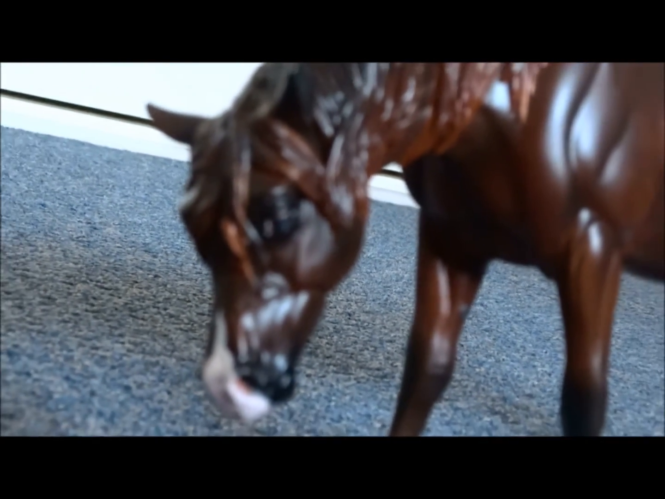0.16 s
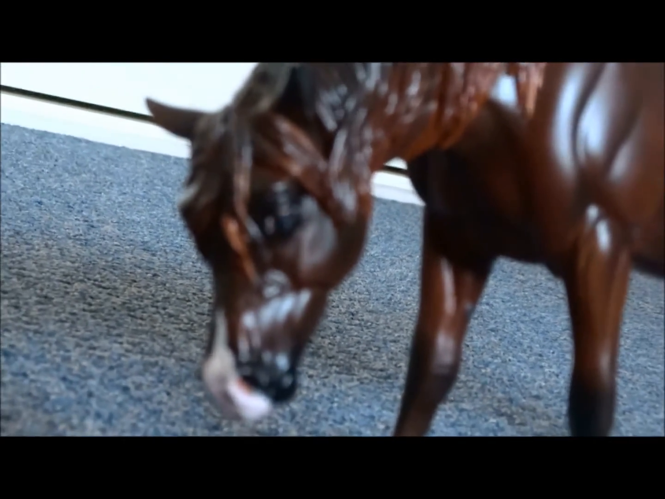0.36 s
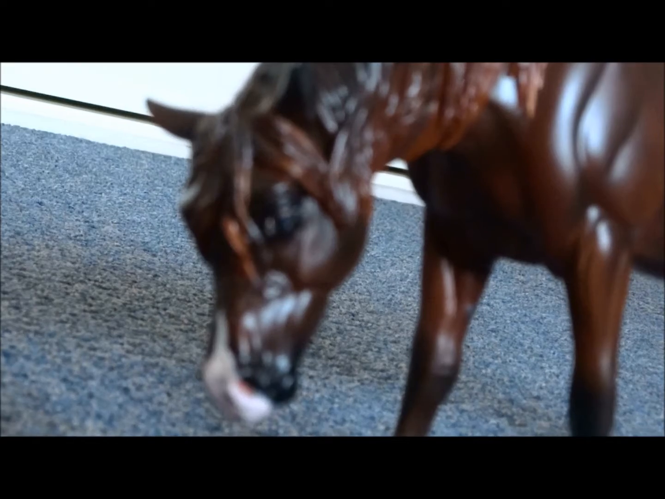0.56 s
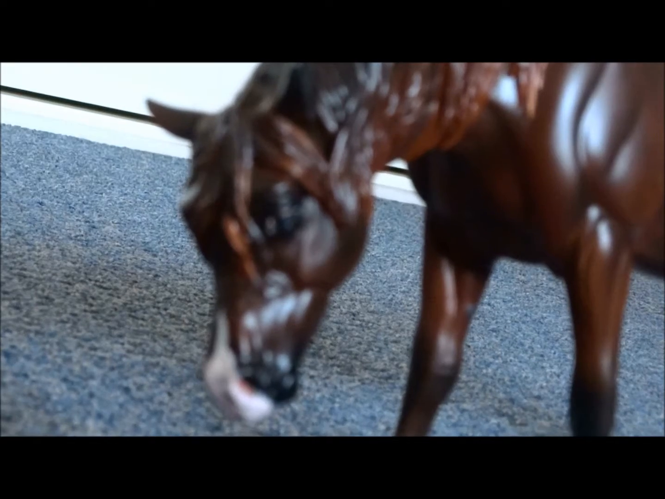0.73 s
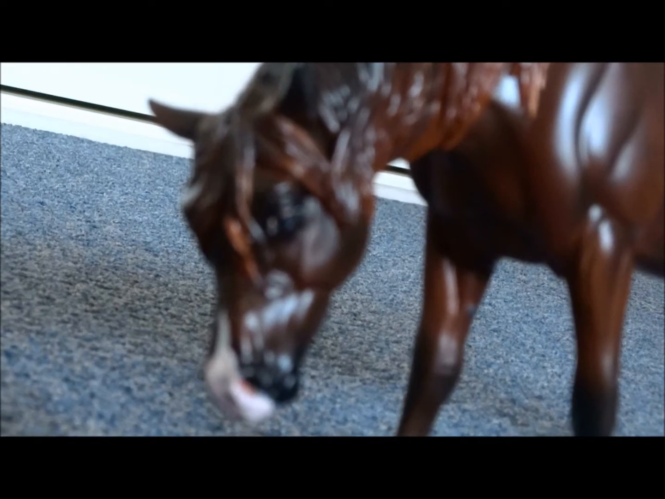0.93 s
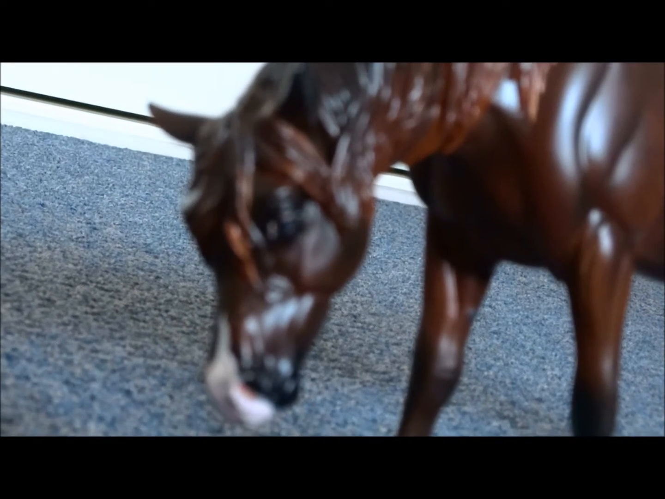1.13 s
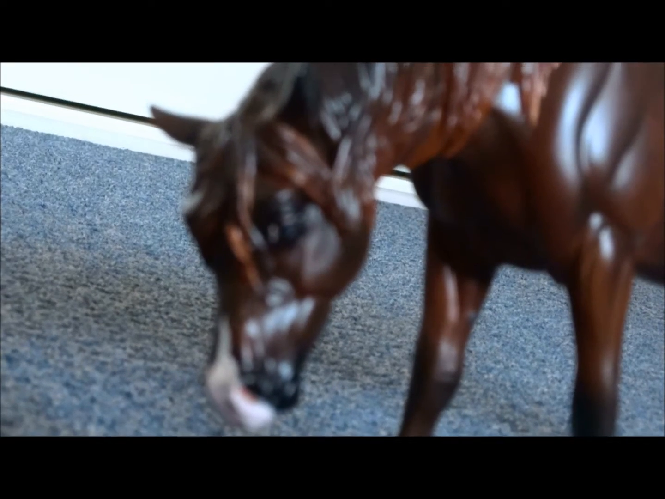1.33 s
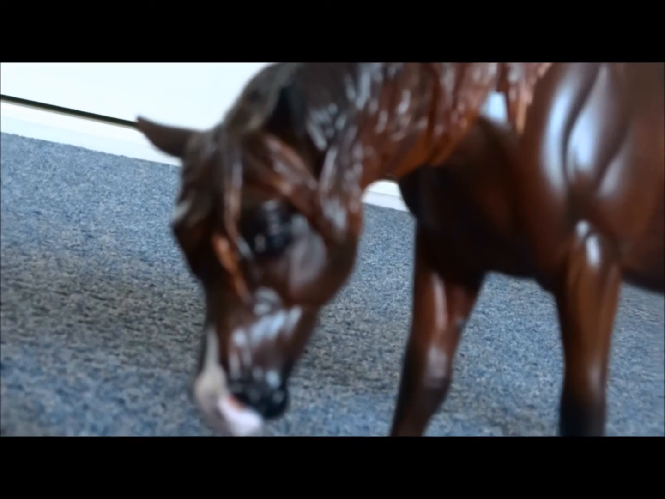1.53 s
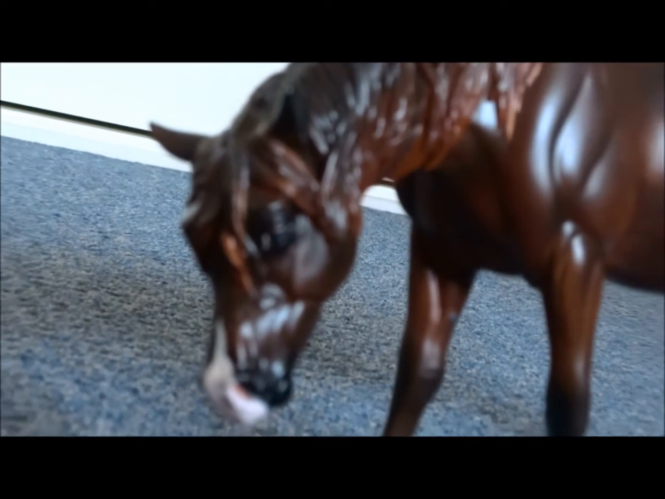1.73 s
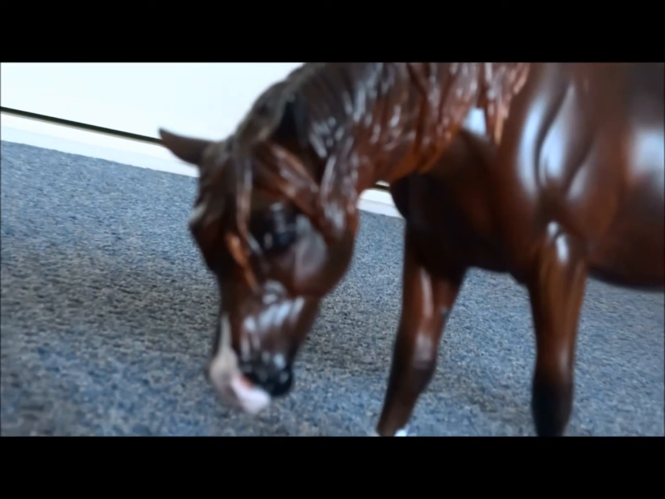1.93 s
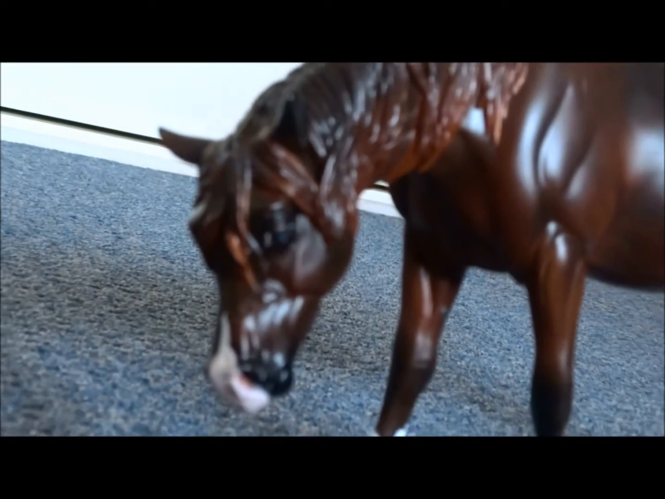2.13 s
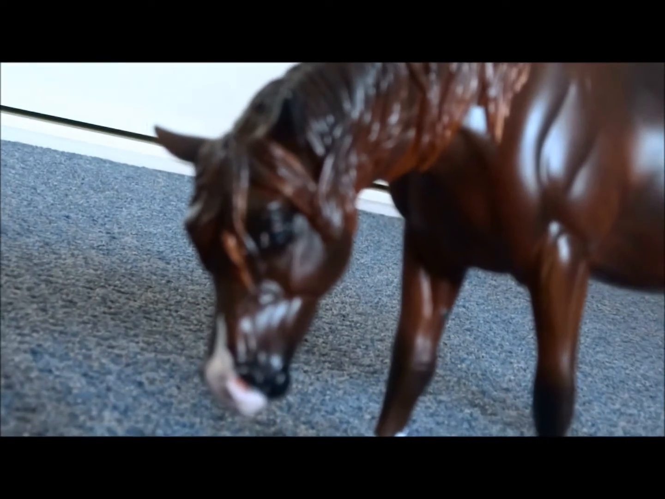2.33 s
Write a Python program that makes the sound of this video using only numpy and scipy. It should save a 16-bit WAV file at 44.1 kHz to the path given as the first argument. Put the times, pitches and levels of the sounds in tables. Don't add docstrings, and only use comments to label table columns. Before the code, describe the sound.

A tiny camera focus motor, heard very close through the camera body, finishes a short buzzing whir, falls quiet over hiss and faint regular ticks, snaps twice, then clunks loudly and whirs again before stopping.

```python
import sys
import numpy as np
from scipy import signal
from scipy.fft import rfft, irfft, next_fast_len
from scipy.io import wavfile
from scipy.ndimage import map_coordinates

SR = 44100
rng = np.random.default_rng(int(sys.argv[2]) if len(sys.argv) > 2 else 0)


def digitize_waveform(pressure):
    field = np.atleast_2d(pressure).T
    bounded = np.clip(field, -1, 1)
    quanta = np.round(bounded * 32767).astype(np.int16)
    wavfile.write(sys.argv[1], SR, quanta)


def volts_from_decibels(level):
    exponent = np.asarray(level, float) / 20
    return 10 ** exponent


N = 105443

# start_s, end_s, level_db, rise_s
OUT_RUNS = [
    (-.3, .025, -50.5, .02),
    (1.385, 1.92, -50.5, 0.15),
]
IN_RUNS = [
    (.088, .288, -52, 0.035),
    (1.988, 2.19, -52.5, 0.025),
]
# centre_hz, width_hz, level_db
OUT_HOUSING = [(579, 48, -6), (922, 75, -8), (1103.5, 39, 3.5), (1338, 52, 0.5), (1714, 61, 2),
               (1871, 39, -2.5), (2240, 48, -34)]
OUT_GEARS = [(2790, 79, -18), (3680, 210, -8), (2900, 2900, -24.5), (4850, 210, -6), (5230, 370, -12.5),
             (5630, 45, -11), (6340, 520, -4.5), (6740, 47, -2.5), (7570, 106, -2.5), (8325, 120, 4.5),
             (8830, 28, -1.5), (10110, 41, 2), (10910, 310, 1), (9540, 970, -21.5)]
IN_HOUSING = [(224, 114, -7.5), (390, 108, -1.5), (600, 120, 1), (1015, 138, 3), (1210, 410, 1),
              (1697, 49, 5), (1770, 87, -0.5)]
IN_GEARS = [(3605, 75, 3), (4930, 400, 2), (5240, 85, 3.5), (5780, 200, -2.5), (6460, 320, 2.5),
            (6800, 190, -13), (7430, 140, -5.5), (8600, 130, -26), (10610, 400, 0.5)]
TURNS_PER_S, SPEED_WANDER = 60, 0.002
HOUSING_TOP_HZ = 1960
GEARS_BITE_S = 0.0075
SWELL_FULL_HZ, SWELL_SCATTER_RAD = 8000, 0.5
UNSTEADY_DB, FLUTTER_DB = 1.8, 1.5
WHINE_HZ, WHINE_DB, WHINE_WAVER_DB = 592, -12.5, 1.5
STOP_S = 0.012

# time_s, peak_db, thud_db, knock_db, ring_db
CLICKS = [(0.112, -44, -7, -7, -3), (0.126, -31, -18, -14, -2), (1.382, -37.5, -9, -3, -28),
          (1.403, -29, -10.5, -3.5, -6), (1.44, -24.5, -13, -2.5, -5.5), (1.454, -13, -16, -8.5, -8.5),
          (1.488, -15, -15, -14.5, -8), (1.534, -32, -9, -11, -16), (2.01, -28, -20.5, -8, -2.5),
          (2.038, -40, -22, -2, -14), (2.069, -36.5, -17, -8, 0.5), (2.081, -48, -3, -19, -14),
          (2.114, -38.5, -2, -7, -10)]
SNAPS = [
    (1.103, -53, -20, -4, -12),
    (1.156, -40, -3, -12, -8),
    (1.132, -45.5, -6, -4.5, 0),
    (1.137, -26.5, -15.5, -6, -17),
    (1.16, -24.5, -13.5, -11, -12),
    (1.265, -44, -35, -8, -33),
]
# freq_hz, level_db, t60_s
THUD_MODES = [(223, -13, 0.05), (510, 3, 0.079), (605, 7, 0.079), (763, 1, 0.078), (983, 10, 0.031),
              (1197, -2, 0.14)]
KNOCK_MODES = [(1455, -6.5, 0.045), (1802, 0.5, 0.045), (2404, 0.5, 0.019), (2840, -2, 0.029),
               (3507, 1.5, 0.016)]
RING_MODES = [(4734, 2, 0.011), (5200, -9, 0.006), (6260, -7, 0.009), (7090, -7, 0.009), (8300, -1, 0.009),
              (8844, -10, 0.008), (10350, -15, 0.008)]
CONTACT_S = 0.00093
CRACK, SCATTER_DB = 0.65, 2

# start_s, end_s, level_db, rise_s
CRUNCHES = [
    (1.392, 1.42, -51, 0.0029),
    (1.42, 1.442, -40.5, 0.02),
    (1.446, 1.454, -39, 0.0049),
    (1.456, 1.475, -52, 0.0022),
    (1.478, 1.487, -45, 0.004),
    (.138, .155, -55.5, 0.0089),
    (2.055, 2.075, -61, 0.021),
]
# start_s, end_s, level_db, rise_s
SLIDES = [
    (1.165, 1.243, -56, 0.003),
    (1.243, 1.271, -57, 0.013),
]
# centre_hz, width_hz, level_db
SLIDER_PEAKS = [(590, 120, 2.5), (1920, 84, -5), (2530, 31, -1), (3500, 160, -7.5), (4690, 73, -4),
                (6200, 120, -14), (6960, 68, -5), (7540, 50, -1.5), (7880, 73, -1.5), (8660, 61, -6)]
# start_s, end_s, level_db, rise_s
COASTS = [
    (.288, 0.33, -61.5, 0.0039),
    (2.188, 2.215, -58, 0.0043),
    (0.028, 0.026, -55, .002),
    (1.925, 1.934, -63, 0.0023),
]

# time_s, peak_db
PIPS = [(0.019, -41), (.089, -48), (.096, -46), (.111, -53), (.12, -50), (0.134, -33.5), (.14, -40),
        (0.148, -40), (0.207, -47), (1.989, -46), (2.002, -54), (2.028, -39.5), (2.038, -42.5),
        (2.114, -49), (2.146, -49)]
# freq_hz, level_db, t60_s
PIP_MODES = [(1238, -7, 0.031), (1360, 4, 0.006), (1620, -2, 0.0085)]
# time_s, peak_db
SKIPS = [
    (.019, -46.5),
    (1.667, -42),
    (1.832, -55),
    (1.898, -56),
    (1.913, -40.5),
    (2.031, -60),
    (2.141, -44),
]
# freq_hz, level_db, t60_s
SKIP_MODES = [(6120, -3, 0.022), (6920, -3.5, 0.037), (8900, -4, 0.01)]
# start_s, end_s, level_db, rise_s
SQUEALS = [
    (.105, .12, -55, .006),
    (.139, .155, -52, 0.0032),
    (.168, .176, -52, .004),
    (1.413, 1.418, -52, .002),
    (1.428, 1.441, -47, 0.0078),
    (1.448, 1.457, -43.5, 0.0039),
    (1.999, 2.008, -52.5, 0.0075),
    (2.03, 2.045, -50, 0.0098),
    (2.052, 2.078, -47, 0.011),
]
# centre_hz, width_hz, level_db
SQUEAL_TOOTH = [(4735, 320, 0)]

# start_s, end_s, level_db, rise_s
SONGS = [
    (.17, .288, -62, .06),
    (2.11, 2.188, -55.5, 0.057),
]
# centre_hz, width_hz, level_db
SONG_TEETH = [(6870, 340, -4), (7680, 290, 1)]
# start_s, end_s, level_db, rise_s
IDLES = [
    (.025, .04, -65.5, 0.0055),
    (.288, .33, -68, .004),
    (1.92, 1.94, -68.5, 0.0043),
    (2.188, 2.21, -67.5, .004),
]
# centre_hz, width_hz, level_db
IDLE_TEETH = [(3420, 500, 1), (6140, 4200, -5.5)]
# time_s, peak_db
SETTLES = [
    (.036, -50.5),
    (.301, -52),
    (.318, -50),
    (.33, -47),
    (.228, -41.5),
    (1.505, -38),
    (2.08, -41),
]
# freq_hz, level_db, t60_s
SETTLE_MODES = [(338, -10, 0.025), (616, 3, 0.033), (1080, -3, 0.022)]

# time_s, peak_db
TICKS = [(0.498, -60), (0.574, -54), (0.613, -56.5), (0.653, -58), (0.695, -56.5), (0.734, -57),
         (0.776, -56), (0.814, -75), (0.856, -56.5), (0.894, -56), (0.934, -65), (0.973, -57.5),
         (1.014, -55.5), (1.052, -59), (1.093, -52.5), (1.295, -52.5), (1.333, -54)]
# freq_hz, level_db, t60_s
TICK_MODES = [(235, 3.5, 0.014), (496, 5.5, 0.056), (604, -2, 0.022), (846, -18, 0.037)]
TICK_LIFT_DB = 0.5
# centre_hz, width_hz, level_db
HUM_PEAKS = [(508, 71, 2), (858, 47, 11)]
# start_s, end_s, level_db, rise_s
HUM_RUN = [
    (0.48, 2.2, -73, 0.34),
]
# centre_hz, width_hz, level_db
RUMBLE_PEAKS = [(175, 116, 0)]
# start_s, end_s, level_db, rise_s
RUMBLE_RUN = [
    (1.028, 1.603, -70, 0.086),
]

# freq_hz, level_db_per_hz
HISS = [(12, -19), (20, -9.5), (112, -4.5), (258, -2.5), (392, -2), (764, -2.5), (981, -5), (1410, -8),
        (15400, -25)]
# freq_hz, likeness
HISS_ALIKE = [(60, 1), (240, 0.25), (950, 0.01), (3760, 0.22), (14900, 1)]
HISS_DB = -66
# freq_hz, side_under_mid_db
SIDE_DB = [(60, -5), (180, -10), (550, -5), (1640, -6), (4960, -11), (14900, -12.5)]
BODY_LOW_HZ = 115
MIC_TOP_HZ, MIC_FALL = 10500, 8.2
CUT_HZ, CUT_JITTER_HZ = 15250, 150
CUT_HZ_PER_DB, QUIET_DB = 200, -57


def unit(x):
    return x / np.sqrt(np.mean(x ** 2) + 1e-20)


def along(points, hz):
    f, v = np.transpose(points)
    return np.interp(np.log(hz + 1), np.log(f + 1), v)


def wobble(rate_hz):
    knots = rng.standard_normal(int(N * rate_hz / SR) + 4)
    return map_coordinates(knots, [np.arange(N) * rate_hz / SR])


def filtered(x, response):
    m = next_fast_len(N + SR // 8)
    return irfft(rfft(x, m) * response(np.fft.rfftfreq(m, 1 / SR)), m)[..., :N]


def body(peaks, wider):
    def response(f):
        total = 0
        for k, (centre_hz, width_hz, db) in enumerate(peaks):
            loss = 1j * f * width_hz * wider
            total = total + (-1) ** k * volts_from_decibels(db) * loss / (centre_hz ** 2 - f * f + loss)
        return total
    return response


def rubbing(grain_db, grain_hz, response):
    return unit(filtered(rng.standard_normal(N) * volts_from_decibels(grain_db * wobble(grain_hz)), response))


def resonant(peaks):
    return unit(filtered(rng.standard_normal(N), lambda f: body(peaks, 1)(f) ** 2))


def spells(rows, stop_s=STOP_S):
    t = np.arange(N) / SR
    total = np.zeros(N)
    for start, end, db, rise in rows:
        fall_db = 26 * np.clip(t - end, 0, 1) / stop_s
        total += volts_from_decibels(db - fall_db) * np.clip((t - start) / rise, 0, 1)
    return total


def strikes(times, levels_db, modes, contact_s):
    out, t = np.zeros(N + SR), np.arange(SR // 16) / SR
    hz, db, t60 = np.transpose(modes)[:, :, None]
    band = signal.butter(3, [.8 * hz.min(), 1.15 * hz.max()], "bandpass", fs=SR, output="sos")
    for s, level_db in zip(times, levels_db):
        level_draw, pitch_draw, phase_draw = rng.standard_normal((3, len(modes), 1))
        decay = volts_from_decibels(db + SCATTER_DB * level_draw - 60 * t / t60)
        ring = decay * np.sin(2 * np.pi * hz * (1 + 0.019 * pitch_draw) * t + 2 * phase_draw)
        crack = unit(signal.sosfilt(band, rng.standard_normal(len(t))))
        crack = crack * volts_from_decibels(db.max() - 60 * t / t60.min())
        hit = ring.sum(0) + CRACK * np.sqrt(len(modes)) * crack
        hit = hit * (1 - np.exp(-t / contact_s)) ** 2
        out[round(s * SR):][:len(t)] += volts_from_decibels(level_db) * hit / np.abs(hit).max()
    return out[:N]


def motor(rows, housing, gears, gears_db, depth_db, rough, wider, brighten_db):
    t = np.arange(N) / SR
    turns = np.cumsum(TURNS_PER_S * (1 + SPEED_WANDER * wobble(8))) / SR
    at = np.flatnonzero(np.diff(np.floor(3 * turns + .06 * wobble(150))) > 0)
    knocks = np.zeros(N)
    knocks[at] = volts_from_decibels(0.43 * rng.standard_normal(len(at)))
    gate = volts_from_decibels(3.1 * np.cos(3 * 2 * np.pi * turns))
    scrape = unit(gate * rng.standard_normal(N))
    drive = np.sqrt(1 - rough) * unit(knocks) + np.sqrt(rough) * scrape
    low = filtered(drive, lambda f: body(housing, wider)(f) / (1 + (f / HOUSING_TOP_HZ) ** 24))

    progress, bite = np.full(N, -.5), np.zeros(N)
    for start, end, *_ in rows:
        progress += np.clip((t - start) / (end - start), 0, 1) * (t < end + .05)
        bite += np.clip((t - start) / GEARS_BITE_S, 0, 1) * (t > start) * (t < end + .05)
    bands = filtered(rng.standard_normal(N), lambda f: np.array([body([peak], wider)(f) for peak in gears]))
    high = np.zeros(N)
    for (hz, *_), band in zip(gears, bands):
        phase = 2 * np.pi * turns + SWELL_SCATTER_RAD * rng.standard_normal()
        swell_db = depth_db * min(hz / SWELL_FULL_HZ, 1) ** 2 * np.cos(phase)
        drift_db = UNSTEADY_DB * wobble(9.78) + FLUTTER_DB * wobble(90)
        colour_db = brighten_db * progress * np.sin(np.pi * np.log2(hz / 5600))
        high += volts_from_decibels(swell_db + drift_db + colour_db) * band
    high = bite * high
    return spells(rows) * volts_from_decibels(0.37 * wobble(29.64)) * (unit(low) + volts_from_decibels(gears_db) * unit(high))


def whine():
    phase = 2 * np.pi * WHINE_HZ * np.arange(N) / SR + .5 * wobble(39.6)
    return spells(OUT_RUNS) * volts_from_decibels(WHINE_DB + WHINE_WAVER_DB * wobble(29.7)) * np.sin(phase)


def clicks(rows, ring_modes, thud_db, knock_db, ring_db):
    s, db, thud, knock, ring = np.transpose(rows)
    low = strikes(s, db + thud + thud_db, THUD_MODES, CONTACT_S)
    middle = strikes(s, db + knock + knock_db, KNOCK_MODES, CONTACT_S)
    return low + middle + strikes(s, db + ring + ring_db, ring_modes, CONTACT_S)


def crunch():
    teeth = [(hz, 3.4 / t60, db) for hz, db, t60 in THUD_MODES + KNOCK_MODES + RING_MODES]
    return spells(CRUNCHES, stop_s=0.019) * rubbing(2.5, 300, body(teeth, 1))


def slack():
    pips = strikes(*np.transpose(PIPS), PIP_MODES, 0.00054)
    skips = strikes(*np.transpose(SKIPS), SKIP_MODES, 0.00095)
    return pips + skips + spells(SQUEALS, stop_s=0.0051) * resonant(SQUEAL_TOOTH)


def slider():
    return spells(SLIDES) * rubbing(2.0, 120, body(SLIDER_PEAKS, 2.4))


def coast():
    dull = lambda f: body(IN_HOUSING, 1.5)(f) / (1 + (f / HOUSING_TOP_HZ) ** 8)
    return spells(COASTS, stop_s=0.078) * rubbing(2.8, 61, dull)


def run_ends():
    song = spells(SONGS, stop_s=.012) * rubbing(2.6, 60, body(SONG_TEETH, 1))
    idle = spells(IDLES, stop_s=0.22) * rubbing(2.6, 60, body(IDLE_TEETH, 1))
    return song + idle + strikes(*np.transpose(SETTLES), SETTLE_MODES, 0.0011)


def stabiliser():
    s, db = np.transpose(TICKS)
    hum = unit(filtered(rng.standard_normal(N), body(HUM_PEAKS, 0.55)))
    return strikes(s, db + TICK_LIFT_DB, TICK_MODES, 0.0012) + spells(HUM_RUN) * hum


def handling():
    return spells(RUMBLE_RUN, stop_s=0.27) * resonant(RUMBLE_PEAKS)


def ports(x):
    lead = filtered(x, lambda hz: 1j * volts_from_decibels(along(SIDE_DB, hz)))
    side = lead * (0.55 + 0.62 * unit(wobble(400)))

    def microphone(hz):
        low_cut = (1j * hz / (BODY_LOW_HZ + 1j * hz)) ** 4
        return low_cut / np.sqrt(1 + (hz / MIC_TOP_HZ) ** (2 * MIC_FALL))
    return filtered(np.array([x + side, x - side]), microphone)


def room():
    def split(hz):
        angle = np.arccos(np.clip(along(HISS_ALIKE, hz), -1, 1)) / 2
        return volts_from_decibels(along(HISS, hz)) * np.array([np.cos(angle), np.sin(angle)])
    mid, side = filtered(rng.standard_normal((2, N)), split)
    level = volts_from_decibels(HISS_DB + 0.43 * wobble(8.25)) / np.sqrt(np.mean(mid ** 2))
    return level * np.array([mid + side, mid - side])


def scene():
    parts = motor(OUT_RUNS, OUT_HOUSING, OUT_GEARS, gears_db=-3.5, depth_db=4.5, rough=0.28,
                  wider=1.18, brighten_db=-0.5)
    parts += motor(IN_RUNS, IN_HOUSING, IN_GEARS, gears_db=-8.5, depth_db=3.0, rough=0.92,
                   wider=1.36, brighten_db=5)
    parts += whine()
    parts += clicks(CLICKS, RING_MODES, thud_db=2.0, knock_db=-2.0, ring_db=-1.5)
    parts += clicks(SNAPS, RING_MODES[2:6], thud_db=6, knock_db=3.5, ring_db=-2.0)
    parts += crunch() + slack() + slider() + coast() + run_ends() + stabiliser() + handling()
    return ports(parts) + room()


def top_cut(x):
    return signal.sosfilt(signal.butter(12, 15540, fs=SR, output="sos"), x)


def record(dry):
    hz, _, z = signal.stft(dry, SR, nperseg=1024)
    level_db = 10 * np.log10(1.5 * np.sum(np.abs(z) ** 2, axis=(0, 1)) / 2 + 1e-12)
    top_hz = CUT_HZ - CUT_HZ_PER_DB * np.clip(level_db - QUIET_DB, 0, 14)
    top_hz = top_hz + CUT_JITTER_HZ * rng.standard_normal(len(level_db))
    mix = signal.istft(z * (hz[:, None] < top_hz), SR, nperseg=1024)[1][:, :N]
    return top_cut(mix)


dry = scene()
out = record(dry)
digitize_waveform(out)
```